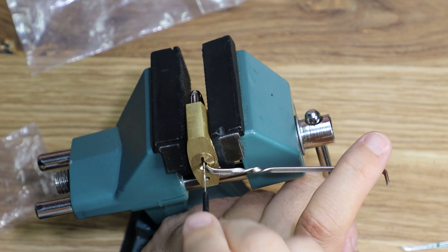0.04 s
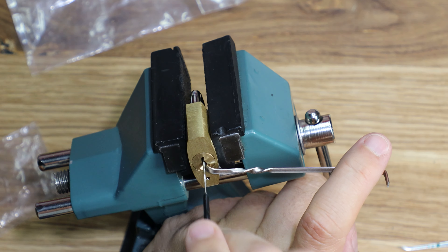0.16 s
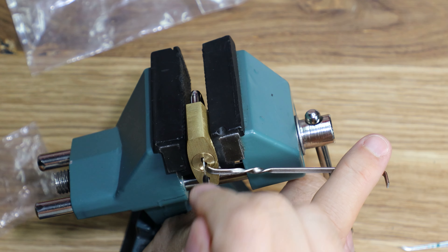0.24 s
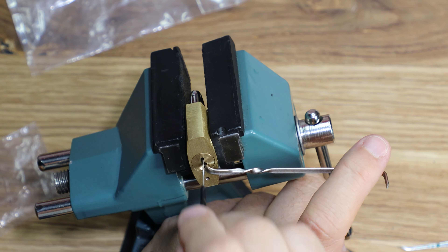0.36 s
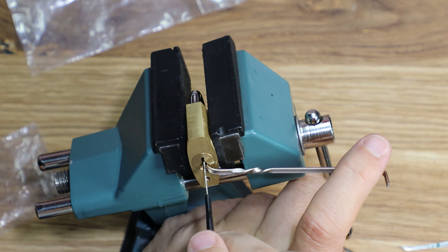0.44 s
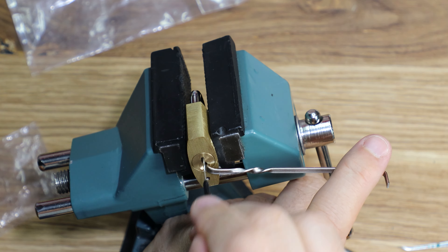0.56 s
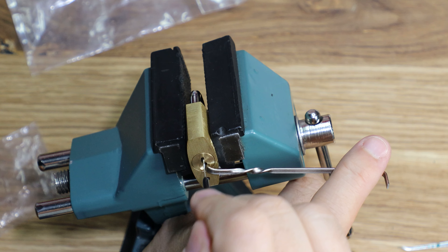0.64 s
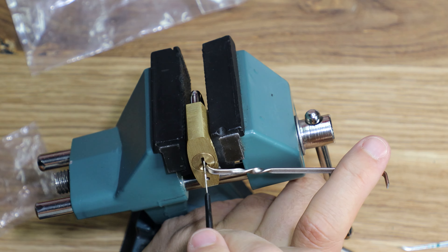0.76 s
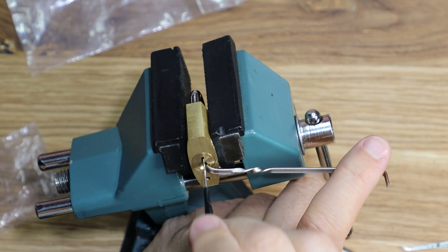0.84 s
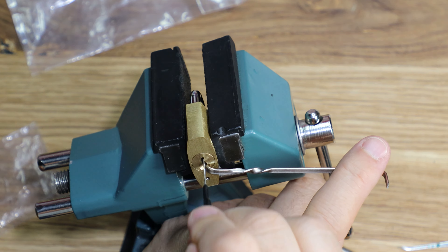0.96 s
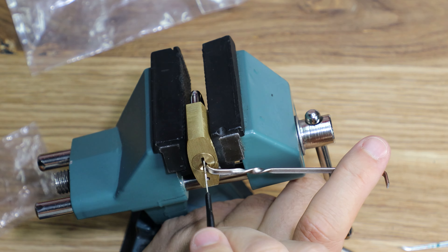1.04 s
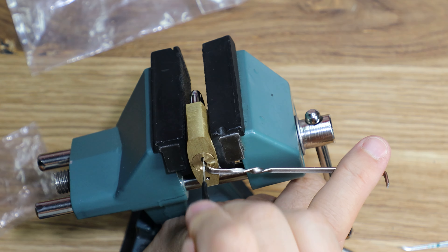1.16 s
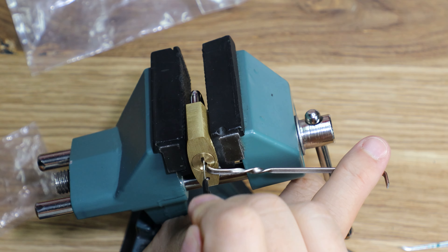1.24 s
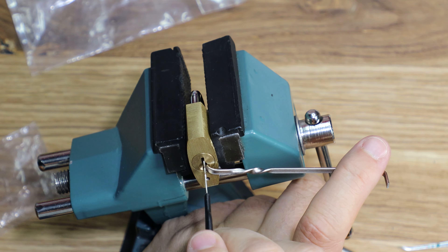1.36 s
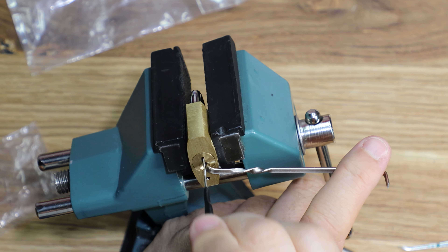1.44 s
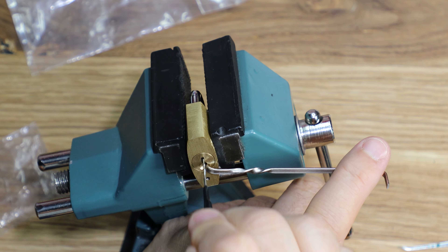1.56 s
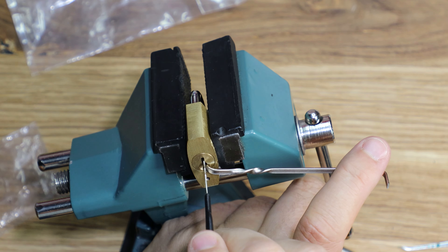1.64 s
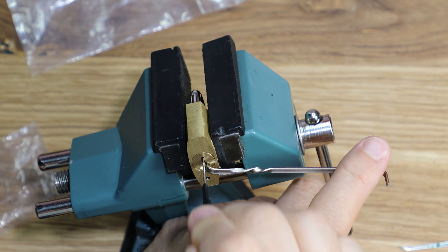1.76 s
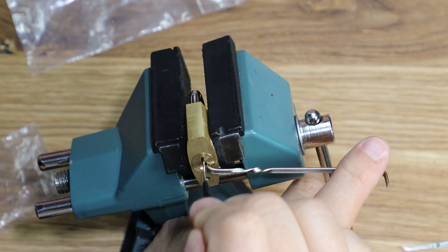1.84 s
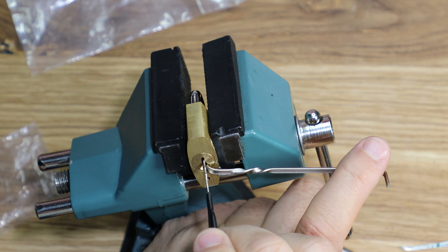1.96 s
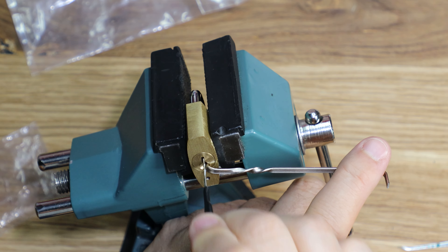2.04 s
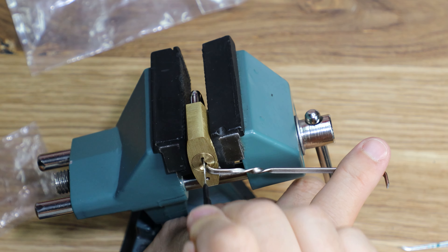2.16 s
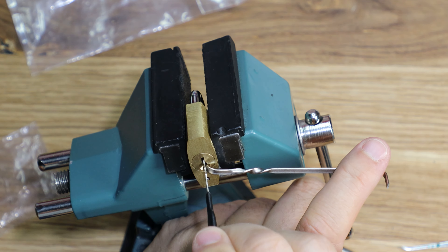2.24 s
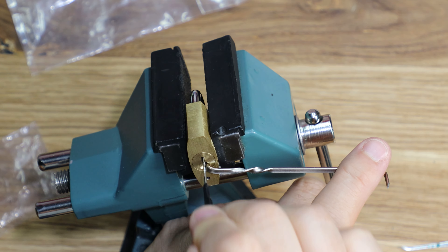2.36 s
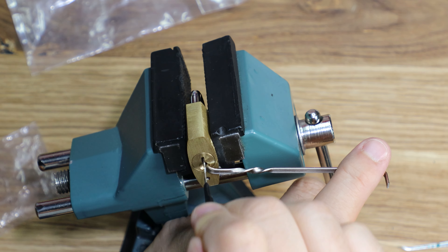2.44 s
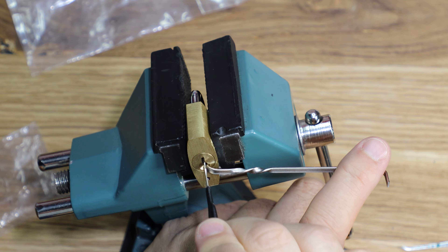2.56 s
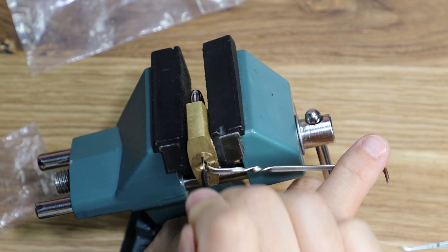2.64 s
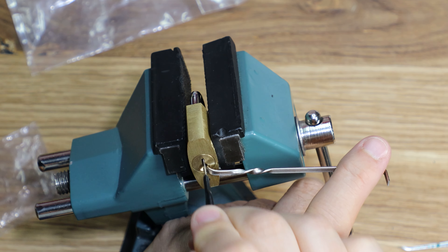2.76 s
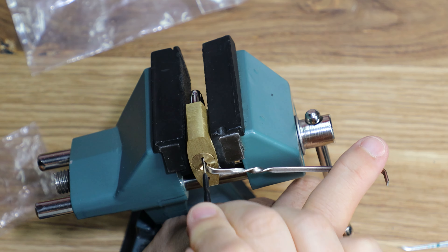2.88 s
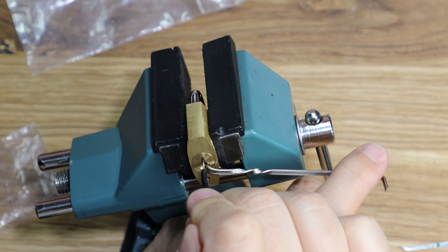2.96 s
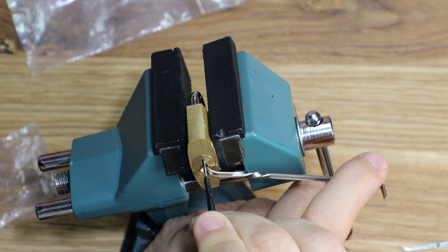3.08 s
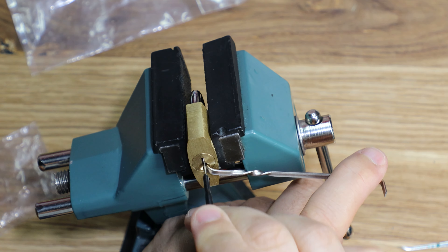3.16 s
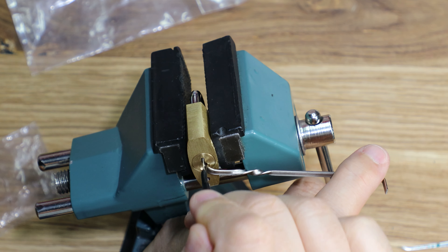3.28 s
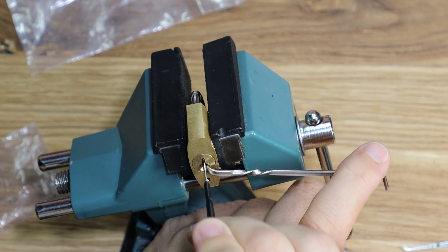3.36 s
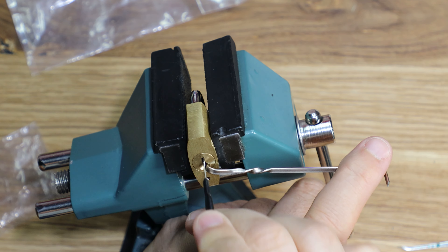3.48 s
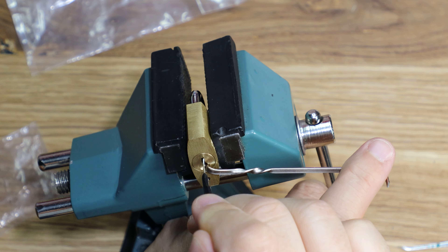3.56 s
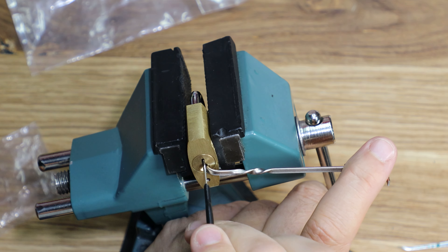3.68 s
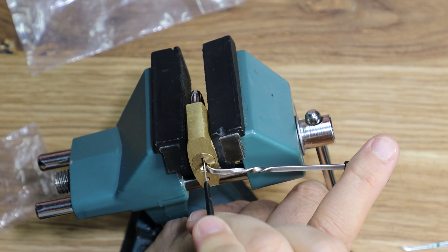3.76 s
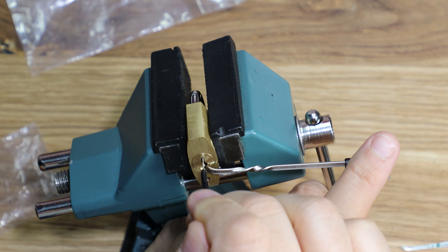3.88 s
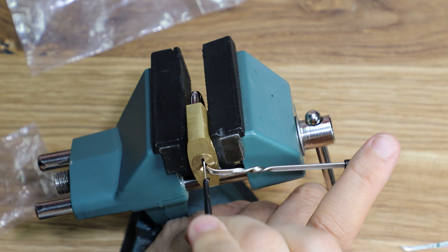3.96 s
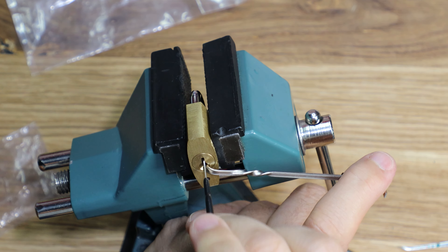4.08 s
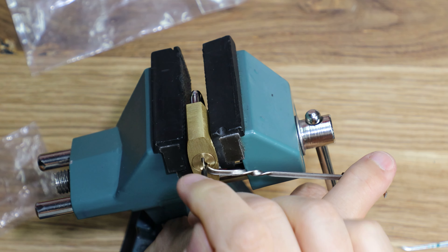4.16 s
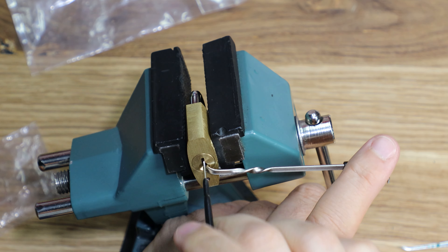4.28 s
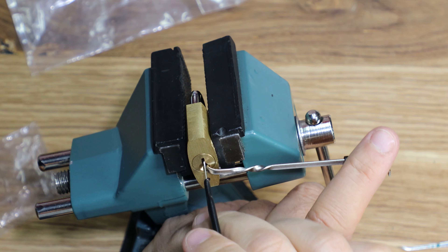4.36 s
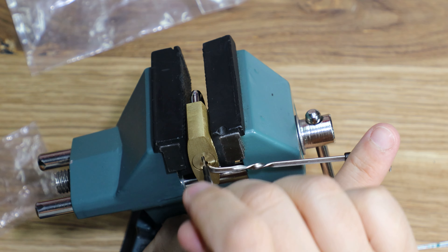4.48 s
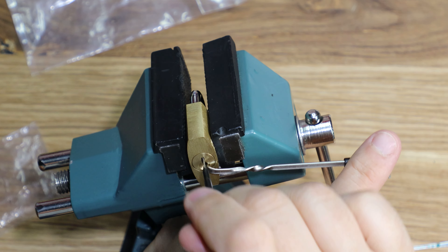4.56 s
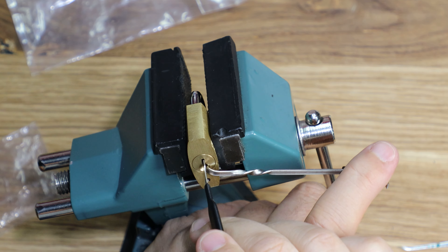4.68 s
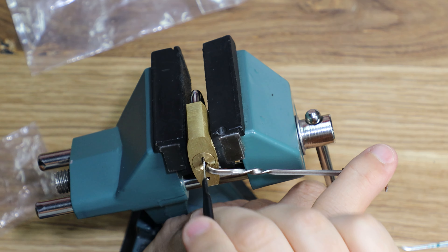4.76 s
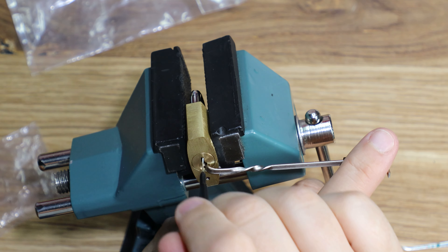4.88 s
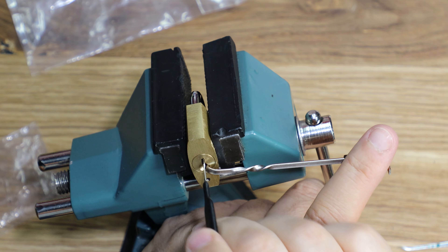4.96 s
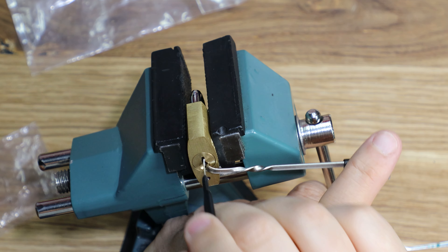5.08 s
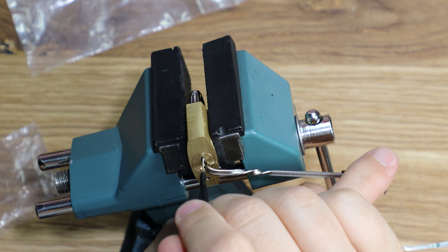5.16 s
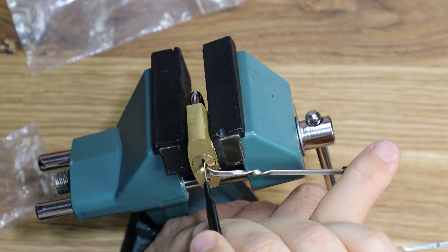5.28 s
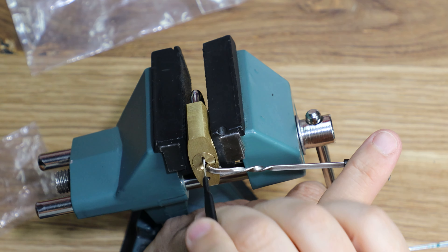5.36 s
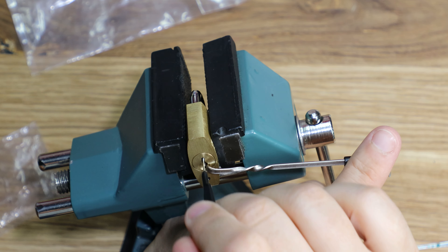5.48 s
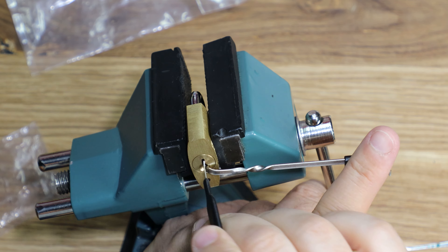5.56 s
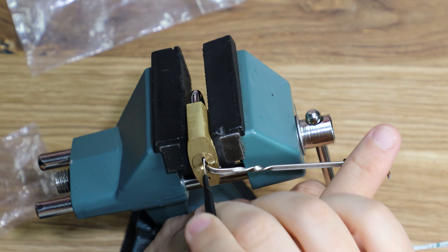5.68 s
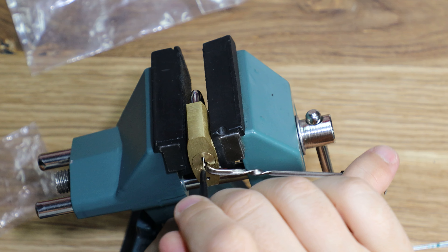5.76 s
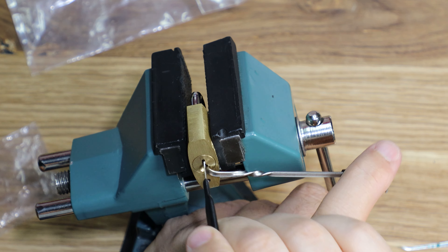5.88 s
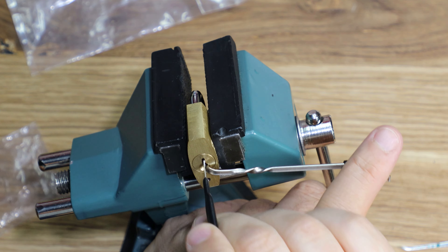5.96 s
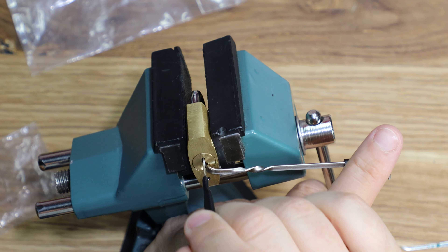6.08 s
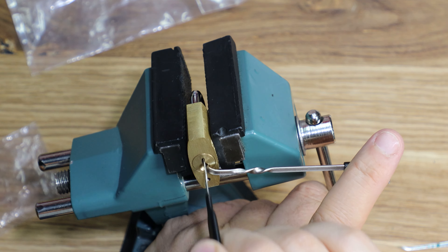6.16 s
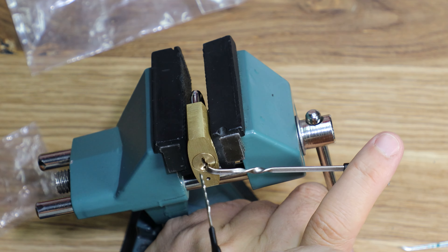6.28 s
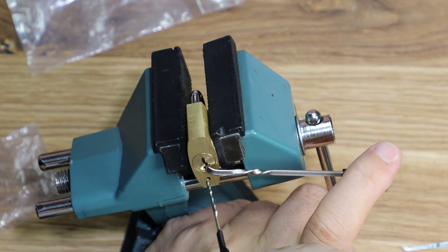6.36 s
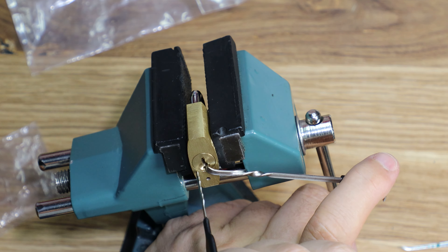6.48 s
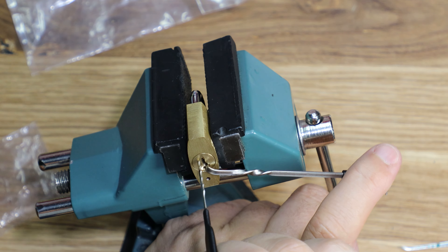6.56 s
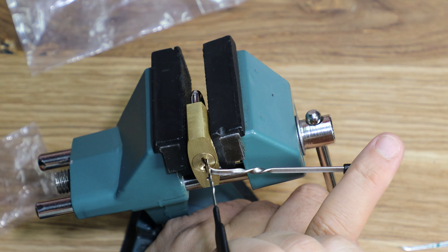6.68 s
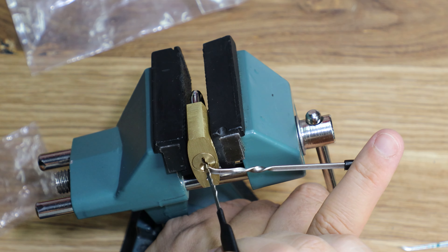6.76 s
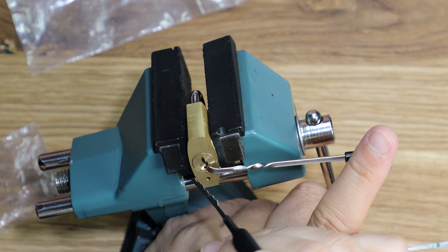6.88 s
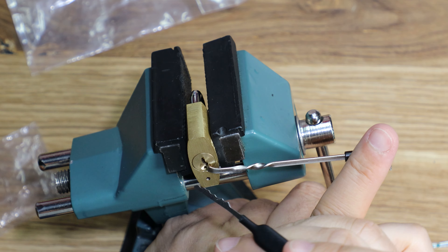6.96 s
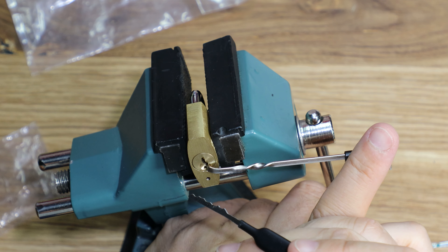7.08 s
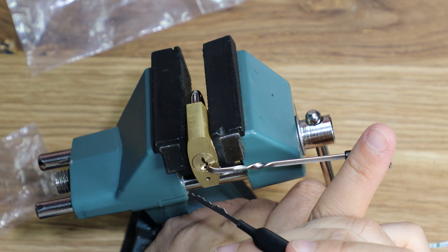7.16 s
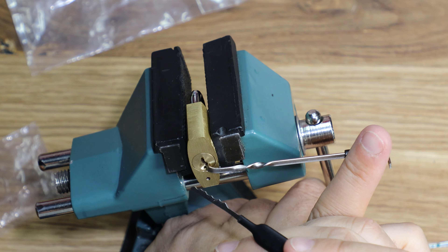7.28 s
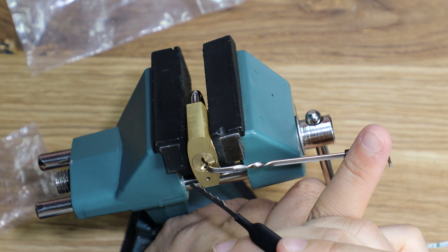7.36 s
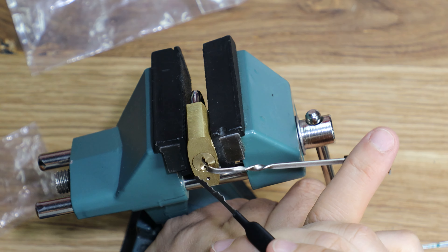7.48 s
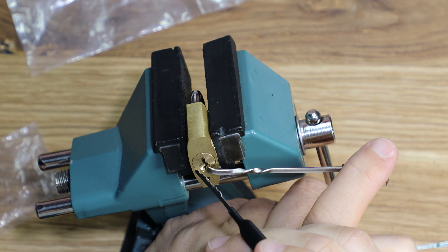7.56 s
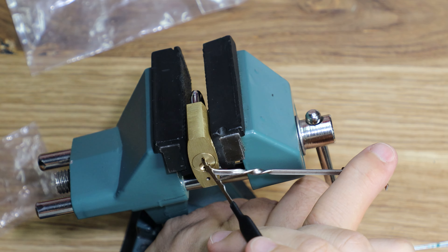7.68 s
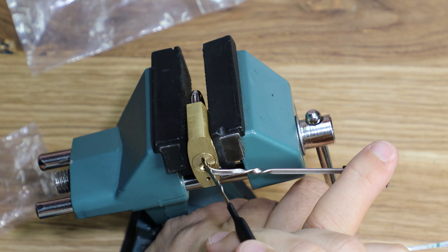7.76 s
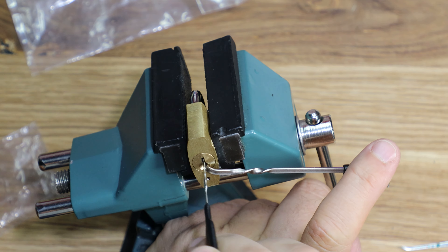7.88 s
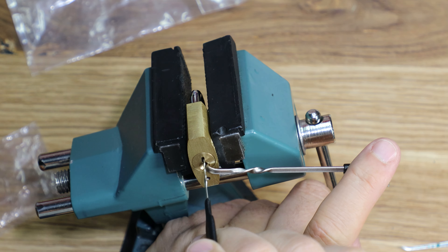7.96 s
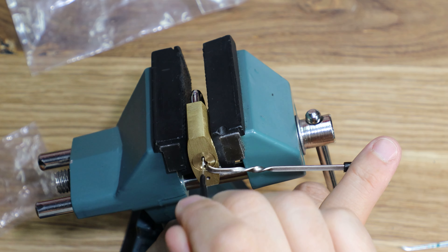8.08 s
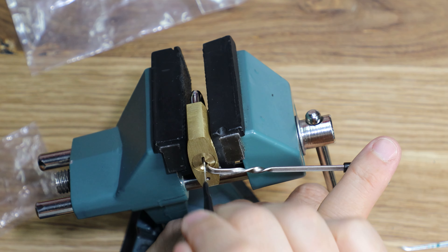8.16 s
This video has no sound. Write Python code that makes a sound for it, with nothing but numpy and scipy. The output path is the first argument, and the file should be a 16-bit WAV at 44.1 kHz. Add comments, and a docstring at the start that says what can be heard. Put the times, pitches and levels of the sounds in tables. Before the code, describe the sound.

Close, centred sound of a steel rake in a brass padlock held in a vise, over faint room rumble and hiss with a very short room tail. From 0.1 s, brief gritty strokes of roughly a tenth of a second come three or four times a second, with dull taps and uneven metallic clicks. Clicks strengthen near 1.1 and 1.7 s; low bench thumps build from 1.9 s. At 2.6-3.1 s come the loudest jolt, hard steel clacks and a very bright snap. Lighter scratching follows around 3.4 s, then brisk scrapes and crisp clicks from 3.9 to 6.3 s. Softer scratches lead to 6.88 s, when the tip slips out with a tiny high ping and fading shimmer. Near-silence holds, with barely audible ticks at 7.6 and 7.8 s. From 7.9 s a faint steely hiss begins, then scrapes, bright snaps and a thump at 8.16 s.

```python
"""A steel rake scrubs in and out of a brass padlock in a bench vise, over faint rumble and hiss (shaped noise).
Stick-slip grains scrape in the keyway and noise bursts through body, tool and pin resonances click and snap;
damped sines thump the bench and vise, and a short diffuse room tail answers everything but the background.
Near 6.9 s the rake slips out with a light ring of decaying noise; two faint clicks follow.
At about 7.9 s a faint steel hiss sets in, and the rake goes back in with scrapes, snaps and a last thump."""
import sys
import numpy as np
from scipy import signal
from scipy.fft import rfft, irfft, next_fast_len
from scipy.io import wavfile
from scipy.ndimage import uniform_filter1d, map_coordinates

SR = 44100
rng = np.random.default_rng(int(sys.argv[2]) if len(sys.argv) > 2 else 0)


def materialize(psi):
    """Save the field psi as 16-bit PCM at rate SR to the path in sys.argv[1].

    A 1-D psi becomes a single channel; in a 2-D psi each row is a channel.
    """
    bounded = np.clip(np.atleast_2d(psi).T, -1, 1)
    quanta = np.round(bounded * 32767).astype(np.int16)
    wavfile.write(sys.argv[1], SR, quanta)


N = 362943

# The rake catches on a pin or the pin snaps free.
# Each row: time in seconds, then relative levels in dB of lock body, steel tools, bright snap.
CLICK_ROWS = [(0.1017, -42.0, -53.5, -54), (0.122, -49, -45.5, -49), (0.161, -47, -47.0, -48.5),
              (0.1972, -49.5, -58, -70.5), (0.3069, -47, -40.5, -49.5), (0.336, -44, -45, -40.0),
              (0.6162, -51, -53, -78), (0.692, -51.5, -49.5, -45.5), (0.8525, -46, -69, -76.0),
              (1.0731, -40, -40, -39.5), (1.1, -33, -37, -50.5), (1.2517, -50, -46, -67),
              (1.2996, -41, -43.5, -43.5), (1.4704, -44, -57.5, -76), (1.5278, -52, -53.5, -64),
              (1.7021, -37.5, -40, -48.5), (1.729, -33.5, -35.5, -41.5), (1.913, -42.5, -42.5, -43),
              (1.9845, -46.5, -60.5, -77), (2.004, -42, -68, -79.0), (2.117, -48, -61, -71),
              (2.2159, -40.5, -43.0, -43), (2.2777, -41.5, -62, -57.5), (2.3037, -44.5, -47.5, -40.5),
              (2.526, -43, -41.5, -43), (2.574, -27.5, -37.0, -37), (2.6075, -32.0, -37, -46),
              (2.7305, -30.5, -20.5, -35), (2.758, -31, -23, -40), (2.8517, -38, -37.0, -43.5),
              (2.8685, -30, -25.5, -15.5), (2.8843, -25.5, -36.0, -31.5), (3.0587, -35.5, -23.5, -21.5),
              (3.1388, -46, -47, -67), (3.3674, -53, -53.0, -50), (3.4423, -46, -45.5, -49.0),
              (3.466, -37.5, -51, -58), (3.4791, -35, -34.5, -45), (3.7342, -39.5, -44.5, -35.5),
              (3.7594, -39.5, -43.5, -46.5), (3.9566, -43, -41.5, -26.5), (3.9676, -52, -53.0, -36),
              (3.9819, -31.5, -34, -31.5), (4.0619, -31.5, -36, -30), (4.2154, -42.5, -35.5, -47),
              (4.2706, -51, -66.0, -67), (4.3875, -40.5, -39.0, -45.5), (4.5955, -28, -31.5, -35.5),
              (4.6169, -55, -39, -46.5), (4.723, -40, -40.5, -44), (4.919, -44, -51.5, -64.5),
              (4.9452, -41, -35.0, -30), (5.0611, -33, -35, -43), (5.2077, -49, -53, -42.5),
              (5.3446, -33.5, -46, -55), (5.3892, -34, -32, -64), (5.5247, -43, -39.5, -32),
              (5.6348, -28, -41, -44), (5.6434, -45, -35.0, -30), (5.8362, -49, -55.5, -54.5),
              (5.9721, -40.5, -53.5, -66.5), (6.139, -43, -41.5, -49), (6.258, -46, -46.5, -43),
              (6.294, -43, -34.5, -30.5), (6.3085, -46, -39.5, -31), (6.3187, -51.5, -45, -36.5),
              (6.465, -85, -79.5, -67), (6.5974, -58.5, -49, -69), (6.6354, -56, -48.5, -74),
              (6.8, -85, -60.5, -69), (6.8688, -55.5, -48.5, -40), (6.8833, -48.5, -42.5, -34),
              (7.611, -73, -69, -85), (7.786, -73.5, -60.0, -65), (7.9597, -45.5, -47.5, -59.5),
              (7.9821, -45.5, -45, -50), (8.155, -38, -34, -30.5), (8.166, -27, -27, -29.5)]
# Passes of the blade through the keyway. Each row: start in seconds, end in seconds, relative rubbing level in dB.
STROKE_ROWS = [(0.088, 0.216, -56.5), (0.276, 0.388, -57), (0.443, 0.548, -55.5), (0.792, 0.875, -58.5),
               (0.907, 0.97, -68.5), (1.077, 1.23, -58.5), (1.389, 1.558, -57.5), (1.69, 1.758, -53),
               (1.81, 1.833, -58), (1.969, 2.135, -63.5), (2.269, 2.452, -62), (2.557, 2.63, -51.5),
               (2.813, 2.894, -45), (3.01, 3.169, -55), (3.322, 3.516, -59), (3.575, 3.69, -67),
               (3.724, 3.796, -56), (3.889, 3.993, -56), (4.023, 4.084, -43), (4.203, 4.283, -54),
               (4.337, 4.415, -49), (4.521, 4.634, -53), (4.669, 4.749, -52.5), (4.86, 4.982, -56.5),
               (5.026, 5.061, -40), (5.206, 5.276, -64), (5.31, 5.408, -56.5), (5.461, 5.564, -54),
               (5.597, 5.655, -57.5), (5.801, 5.884, -62), (5.95, 5.997, -61.5), (6.095, 6.177, -58.5),
               (6.214, 6.318, -45.5), (6.605, 6.697, -62.5), (6.737, 6.867, -75.5), (7.951, 8.047, -55),
               (8.145, 8.192, -44)]
# The padlock in its jaws. Each row: resonance in Hz, width in Hz, relative level in dB.
LOCK_MODES = [(569, 87, -6.5), (730, 69, 2.5), (910.1, 76, -4.5), (1062, 83, -2), (1284, 93, 4.5),
              (1504, 180, 2), (1878, 110, -0.5), (1947, 240, -4.5), (2306, 62, -14.5)]
# Rake and tension wrench. Each row: resonance in Hz, width in Hz, relative level in dB.
STEEL_MODES = [(2512, 170, -4.5), (2950, 110, -2), (3173, 180, -1.5), (3417, 110, -4), (3652, 100, 1),
               (3940, 170, 0), (4190, 120, -3), (4605, 200, -6.5), (5070, 240, -12), (5930, 1200, -15)]


def amp(db):
    """Decibels to gain."""
    return 10 ** (np.asarray(db) / 20)


def unit(x):
    """x scaled to rms 1."""
    return x / np.sqrt(np.mean(x ** 2) + 1e-20)


def along(points, hz):
    """(Hz, value) points interpolated on a log frequency axis."""
    f, v = np.transpose(points)
    return np.interp(np.log(hz + 1), np.log(f + 1), v)


def filtered(x, response):
    """x through a complex frequency response, zero-padded."""
    n = x.shape[-1]
    padded = 2 * next_fast_len(n // 2 + SR // 20)
    spectrum = rfft(x, padded) * response(np.fft.rfftfreq(padded, 1 / SR))
    return irfft(spectrum, padded)[..., :n]


def resonator(modes):
    """Sum of (Hz, width, dB) resonances of alternating sign, each low-passed an octave above its pitch."""
    def mode(f, hz, width):
        r = f / (2 * hz)
        band = 1j * f * width / (hz * hz - f * f + 1j * f * width)
        return band / (1 - r * r + 1j * np.sqrt(2) * r)

    def response(f):
        return sum((-1) ** k * amp(db) * mode(f, hz, width) for k, (hz, width, db) in enumerate(modes))
    return response


def colour(points):
    """Minimum-phase response with the gain of (Hz, dB) points."""
    def response(f):
        cepstrum = irfft(np.log(amp(along(points, f))))
        half = len(cepstrum) // 2
        # folding the cepstrum makes the response causal
        cepstrum[1:half] *= 2
        cepstrum[half + 1:] = 0
        return np.exp(rfft(cepstrum))
    return response


def wobble(rate_hz):
    """Smooth random curve with rate_hz knots a second."""
    knots = rng.standard_normal(int(N * rate_hz / SR) + 4)
    return map_coordinates(knots, [np.arange(N) * rate_hz / SR])


def placed(times, levels_db, sounds, head_s):
    """Sounds laid at their times, each with the given rms over its first head_s seconds."""
    out = np.zeros(N + SR)
    for s, db, sound in zip(times, levels_db, sounds):
        head_rms = np.sqrt(np.mean(sound[:round(head_s * SR)] ** 2))
        first = max(round(s * SR), 0)
        out[first:][:len(sound)] += amp(db) * sound / head_rms
    return out[:N]


def background():
    """Faint room rumble and microphone hiss: stationary shaped noise."""
    # Each row: frequency in Hz, relative density in dB per Hz.
    floor_curve = [(20, -22), (45, -12), (85, 4.5), (130, 2), (200, -10.5), (400, -13), (800, -14),
                   (1500, -19), (2500, -21.5), (4000, -19), (5500, -26), (12300, -18.5), (13300, -29.5),
                   (16000, -45)]
    return amp(-70.5) * unit(filtered(rng.standard_normal(N), colour(floor_curve)))


def leaning(times):
    """Weight of the hands on the vise, in dB, which sets how much of the work reaches the bench."""
    # Each row: time in seconds, weight in dB.
    lean_points = [(0, 5.5), (1, 2), (2.75, 5.5), (2.95, -8.5), (3.7, 0), (4.1, -5), (6.3, -4.5),
                   (6.7, -13), (7.95, 4.5)]
    return np.interp(times, *np.transpose(lean_points))


def swelling(rise_s=0.007, swell_db=-19):
    """Level of noise that rises exponentially for a few milliseconds before each click."""
    u = np.arange(SR // 25) / SR
    rise = np.exp((u - u[-1]) / rise_s)
    level = np.zeros(N)
    for s, _, steel_db, snap_db in CLICK_ROWS:
        first = round(s * SR) - len(u)
        level[first:][:len(u)] += amp((steel_db + snap_db) / 2 + swell_db) * rise
    return level


def pressure(rise_s, fall_s, swell_db):
    """Rubbing force: each stroke rises, drifts by swell_db along its way, then lets go exponentially."""
    t = np.arange(N) / SR
    force = np.zeros(N)
    for start, end, db in STROKE_ROWS:
        near = slice(max(round(start * SR), 0), round((end + 10 * fall_s) * SR))
        u = t[near]
        progress = np.clip((u - start) / max(end - start, .01), 0, 1)
        attack = np.minimum((u - start) / rise_s, 1)
        release = np.exp(-np.maximum(u - end, 0) / fall_s)
        force[near] += amp(db + swell_db * (progress - 1.5)) * attack * release
    return force


def slips(rate_hz, spread_db, life_s):
    """Stick-slip friction of rms 1: decaying ticks of uneven size at random times over a weak even rub."""
    size = amp(spread_db * np.clip(rng.standard_normal(N), -2, 2))
    hits = (rng.random(N) < rate_hz / SR) * size
    ticks = signal.lfilter([1], [1, -np.exp(-1 / (life_s * SR))], hits)
    return unit((unit(ticks) + .3) * rng.standard_normal(N))


def scrape(damping=0.45):
    """The blade grinds through the keyway in small slips; a heavy hand damps the steel and rumbles the bench."""
    # Each row of both: frequency in Hz, relative density in dB per Hz.
    grit_curve = [(200, -23.5), (450, -6.5), (1500, -4), (4200, -9), (5500, -1.5), (9000, -8),
                  (12500, -9.5), (16000, -25)]
    hand_curve = [(30, -40), (55, -17), (75, -4.5), (115, 4.5), (160, 1), (210, -24.5), (400, -25),
                  (700, -46.5)]
    lean_db = leaning(np.arange(N) / SR)
    teeth = amp(3.5 * wobble(70))
    on_lock = pressure(rise_s=.012, fall_s=0.0092, swell_db=1.5) * teeth
    on_steel = on_lock * amp(-damping * lean_db)
    grains = slips(rate_hz=300, spread_db=4, life_s=.0014)
    body = amp(-2) * on_lock * unit(filtered(grains, resonator(LOCK_MODES)))
    tools = amp(-9.5) * on_steel * unit(filtered(grains, resonator(STEEL_MODES)))
    # the swells before the clicks share the grit's noise
    grit = (amp(-12.5) * on_steel + swelling()) * unit(filtered(grains, colour(grit_curve)))
    on_bench = amp(lean_db) * pressure(rise_s=0.042, fall_s=0.032, swell_db=-0.5)
    rumble = on_bench * unit(filtered(rng.standard_normal(N), colour(hand_curve)))
    return body + tools + grit + rumble


def room(x):
    """Short diffuse noise tail of unit energy, each frequency dying at its own speed."""
    # Each row: frequency in Hz, t60 in seconds.
    decay_points = [(200, 0.63), (1400, .36), (4000, 0.18), (8000, 0.17), (15000, 0.31)]
    hz, t, z = signal.stft(rng.standard_normal(SR // 2), SR, nperseg=256)
    decay = amp(-60 * t / along(decay_points, hz)[:, None])
    tail = signal.istft(z * decay, SR, nperseg=256)[1]
    tail = np.pad(tail / np.linalg.norm(tail), (round(0.0027 * SR), 0))
    return signal.fftconvolve(x, tail)[:N]


def taps(colour_db=3):
    """Teeth ride over the pins at an uneven pace in each stroke: soft, dull contacts, as rows like the clicks."""
    taps_per_s, tap_db, spread_db = 26, 4, 4  # level over the rubbing
    steel_db, snap_db = -7.5, -24  # relative to the lock body
    rows = []
    for start, end, db in STROKE_ROWS:
        slip = rng.random(12)
        size, tone = np.clip(rng.standard_normal((2, 12)), -1.5, 1.5)
        s = start + (np.arange(len(slip)) + slip) / taps_per_s
        lock = db + tap_db + spread_db * size
        bright = lock + colour_db * tone
        stroke_rows = np.column_stack([s, lock, bright + steel_db, bright + snap_db])
        rows.append(stroke_rows[s < end])
    return np.vstack(rows)


def struck(modes, count, spread_db):
    """Responses of one part hit at many spots: each blow favours other resonances."""
    weights = amp(spread_db * np.clip(rng.standard_normal((count, len(modes))), -2, 2))

    def response(f):
        return weights @ np.array([(-1) ** k * resonator([mode])(f) for k, mode in enumerate(modes)])
    return response


def contacts(times, levels_db, modes, attack_s, crack_t60, chatter_db, chatter_t60, scatter_db, scatter_t60):
    """Noise bursts of crack, uneven pin chatter and scatter from nearby surfaces, heard through one part."""
    t = np.arange(SR // 9) / SR
    shape = (len(times), len(t))
    smooth = uniform_filter1d(rng.standard_normal(shape), size=50, axis=1)
    bounces = unit(amp(6 * unit(smooth)))
    crack = amp(-60 * t / crack_t60)
    chatter = bounces * amp(chatter_db - 60 * t / chatter_t60)
    scatter = amp(scatter_db - 60 * t / scatter_t60)
    onset = 1 - np.exp(-t / attack_s)
    force = (crack + chatter + scatter) * onset * rng.standard_normal(shape)
    sounds = filtered(force, struck(modes, count=len(times), spread_db=3))
    return placed(times, levels_db, sounds, head_s=.006)


def pins(rows, brightening=0.39, ping_db=-3, springs_db=-3.0):
    """Contacts knock the brass body, ring the steel tools and, when a pin flies free, snap brightly."""
    # Pins in their chambers, then pins and springs flying free.
    # Each row of both: resonance in Hz, width in Hz, relative level in dB.
    pin_modes = [(5620, 1100, -6), (6710, 170, 2.5), (7160, 630, -4), (8380, 610, -0.5), (8856, 400, 1.5),
                 (9890, 820, -0.5)]
    spring_modes = [(10710, 500, -1), (11800, 800, -2), (13100, 600, 0), (14016, 600, 2), (14700, 600, 1),
                    (15550, 600, -1)]
    times, lock_db, steel_db, snap_db = np.transpose(rows)
    # lingering scatter: dB under the crack, t60 in seconds
    metal = dict(attack_s=.0004, chatter_db=-24, scatter_db=-24, scatter_t60=0.097)
    snap = dict(attack_s=.0002, crack_t60=.004, chatter_t60=.032, scatter_db=-21, scatter_t60=.092)
    body = contacts(times, lock_db, LOCK_MODES, crack_t60=.006, chatter_t60=.05, **metal)
    tools = contacts(times, steel_db, STEEL_MODES, crack_t60=.005, chatter_t60=.04, **metal)
    ping = contacts(times, snap_db + ping_db, pin_modes, chatter_db=-16, **snap)
    # the harder the snap stands out from the steel, the more it holds of the highest ring
    hard_db = snap_db + springs_db + brightening * np.clip(snap_db - steel_db, -12, 10)
    sparkle = contacts(times, hard_db, spring_modes, chatter_db=-14, **snap)
    return body + tools + ping + sparkle


def ringing(modes, count, attack_s, spread_db):
    """Damped sine modes that swell briefly, at new strengths for every blow."""
    t = np.arange(SR // 2) / SR
    waves = np.array([amp(db - 60 * t / t60) * np.sin(2 * np.pi * hz * t) for hz, db, t60 in modes])
    strengths = amp(spread_db * rng.standard_normal((count, len(modes))))
    return strengths @ waves * (1 - np.exp(-t / attack_s))


def shaken(times, bench_db, vise_db):
    """A shove rocks the vise on its foot, and the bench top booms under it."""
    # Each row of both: mode in Hz, relative level in dB, t60 in seconds.
    bench_modes = [(76, -16, .28), (113, 0, .095), (106, -15, .25), (136, -10, .17), (156, -10, .13)]
    vise_modes = [(190.4, -2, 0.17), (241.5, 2, 0.095), (306, -2, .07), (360, -10, 0.054),
                  (471, -7.5, 0.089)]
    booms = ringing(bench_modes, count=len(times), attack_s=.014, spread_db=1.5)
    rocks = ringing(vise_modes, count=len(times), attack_s=0.0012, spread_db=4)
    return placed(times, bench_db, booms, head_s=.025) + placed(times, vise_db, rocks, head_s=.025)


def thumps(boom_db=-7, rock_db=0, click_boom_db=-14, click_rock_db=-20):
    """Hard stops jolt the vise; every click nudges it too, booming more as the hands lean on it."""
    # The rake runs up against the lock.
    # Each row: time in seconds, bench level in dB before boom_db, vise level in dB before rock_db.
    jolts = [(0.121, -40, -56), (0.164, -33, -56), (0.85, -43, -75), (1.074, -32.5, -56),
             (1.138, -36.5, -56), (1.297, -35, -54), (1.45, -39.5, -71), (1.91, -29.5, -47.5),
             (2.218, -25.5, -50), (2.276, -33, -56.5), (2.525, -22, -45), (2.728, -18.5, -35.5),
             (3.983, -39, -64), (4.39, -37, -61), (4.74, -46, -58), (5.345, -34.5, -49),
             (5.388, -35.5, -41.5), (5.636, -38, -51), (6.063, -49, -53), (6.283, -31.5, -42.5),
             (8.16, -19, -39)]
    times, bench_db, vise_db = np.transpose(jolts)
    clicks, lock_db, _, _ = np.transpose(CLICK_ROWS)
    nudges = shaken(clicks, lock_db + leaning(clicks) + click_boom_db, lock_db + click_rock_db)
    return shaken(times, bench_db + boom_db, vise_db + rock_db) + nudges


def free_ring(start_s=6.883, shimmer_db=-60, shimmer_t60=.66, tip_db=-32, tip_t60=0.026):
    """Clear of the keyway, the rake's tip pings high and the steel leaves a diffuse, fading shimmer."""
    t = np.arange(SR // 2) / SR
    steel = resonator([(1470, 830, -10.5), (3600, 560, -5), (4340, 300, 1.5)])
    shimmer = filtered(rng.standard_normal(len(t)), steel) * amp(-60 * t / shimmer_t60)
    high = resonator([(11700, 430, 0), (13000, 640, -2.2)])
    tip = filtered(rng.standard_normal(len(t)), high) * amp(-60 * t / tip_t60)
    return placed([start_s, start_s], [shimmer_db, tip_db], [shimmer, tip], head_s=.01)


def steel_whisper(start_s=7.9, fade_s=0.082, level_db=-78):
    """Faint resonant noise in the range of the steel tools, wavering slightly, from start_s to the end."""
    t = np.arange(N) / SR
    held = np.clip((t - start_s) / fade_s, 0, 1)
    steel = resonator([(3710, 310, -2.5), (4100, 210, -1.0)])
    hiss = unit(filtered(rng.standard_normal(N), steel))
    return amp(level_db + 0.97 * wobble(3.9)) * held * hiss


def scene():
    """The lock, the bench and the room, alike in both channels."""
    floor = background()
    work = scrape() + pins(taps()) + pins(CLICK_ROWS) + thumps() + free_ring() + steel_whisper()
    mono = work + amp(-33) * room(work) + floor
    return np.array([mono, mono])


def record(dry):
    """The recorder cuts the deep bass and falls off very steeply above its band limit."""
    low_cut_hz, top_hz = 77.3, 15900
    high_pass = signal.butter(4, low_cut_hz, "highpass", fs=SR, output="sos")
    lean = signal.sosfilt(high_pass, dry)
    return filtered(lean, lambda hz: 1 / np.sqrt(1 + (hz / top_hz) ** 160))


dry = scene()
out = record(dry)
materialize(out)
```